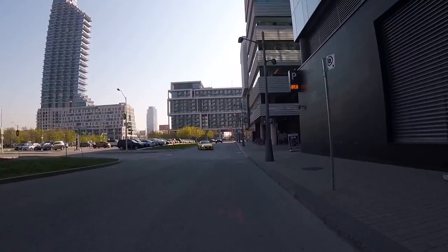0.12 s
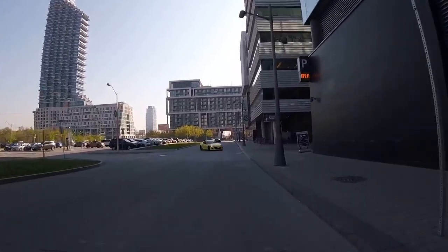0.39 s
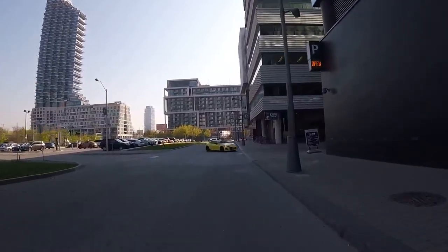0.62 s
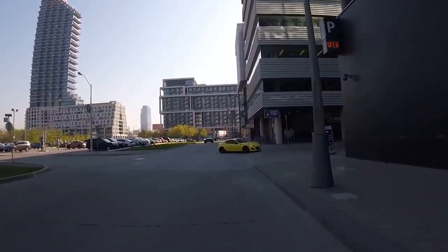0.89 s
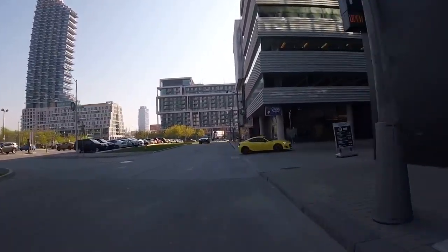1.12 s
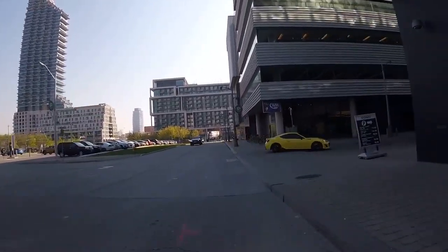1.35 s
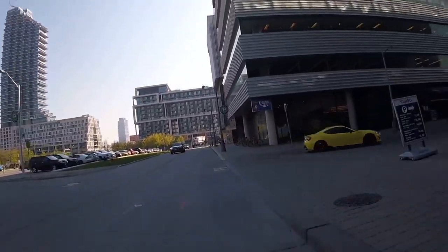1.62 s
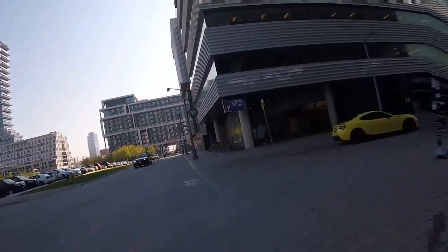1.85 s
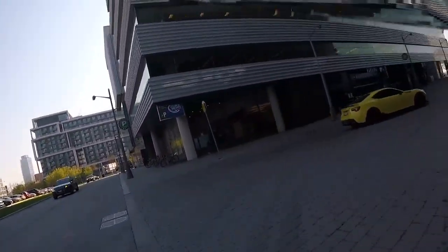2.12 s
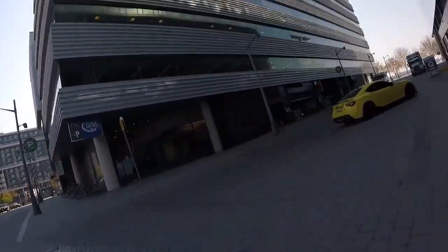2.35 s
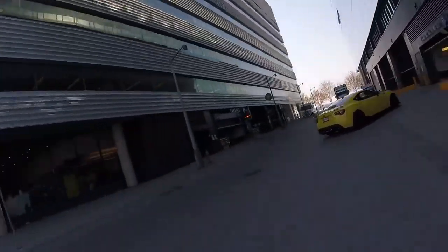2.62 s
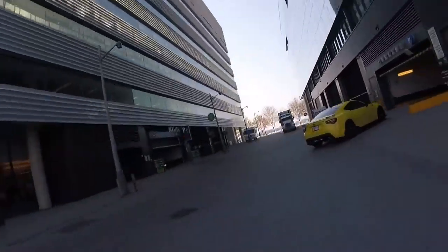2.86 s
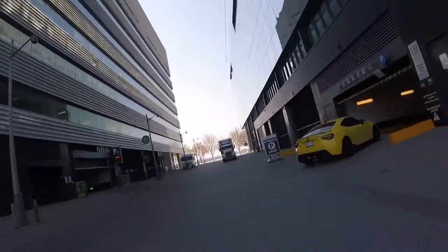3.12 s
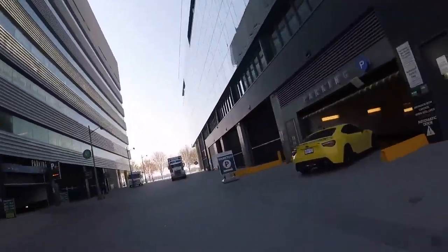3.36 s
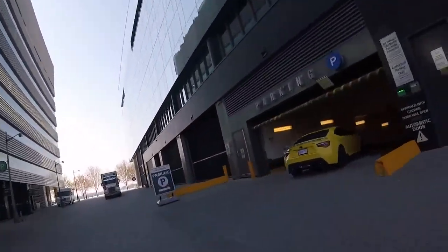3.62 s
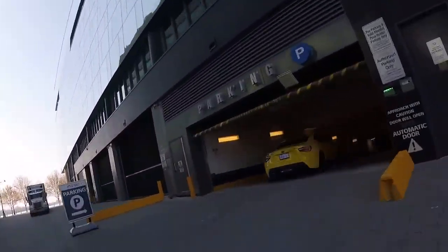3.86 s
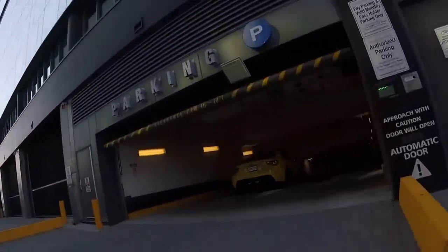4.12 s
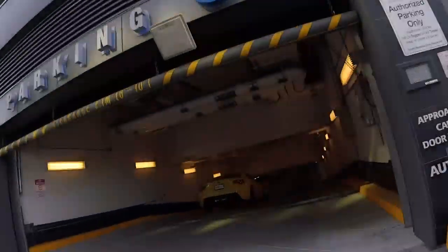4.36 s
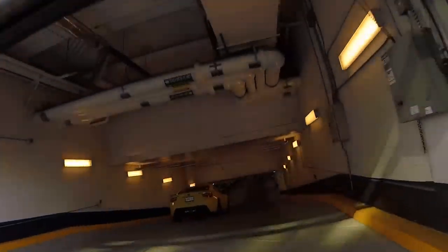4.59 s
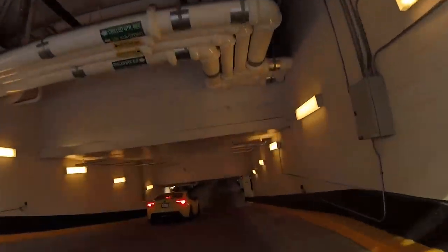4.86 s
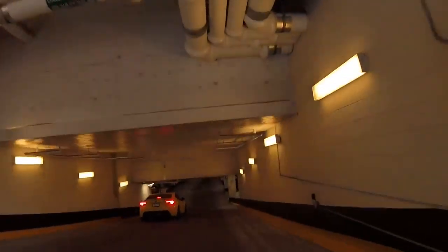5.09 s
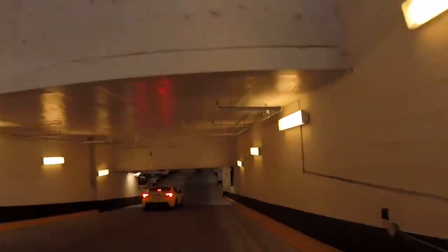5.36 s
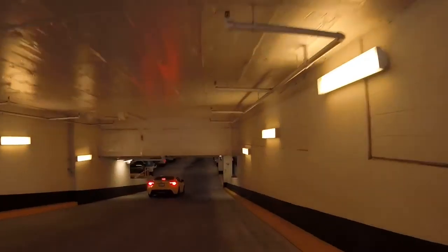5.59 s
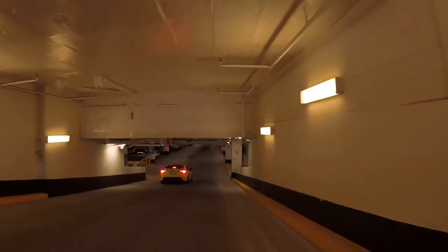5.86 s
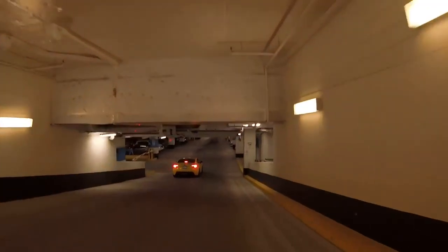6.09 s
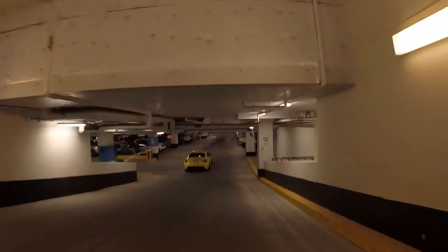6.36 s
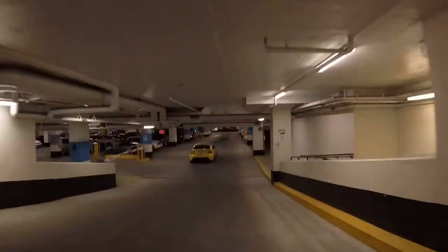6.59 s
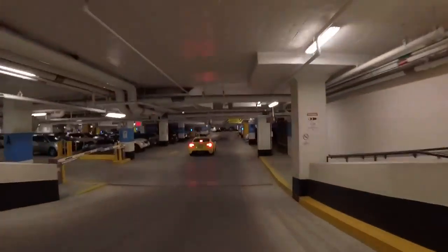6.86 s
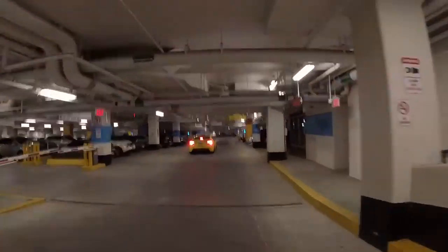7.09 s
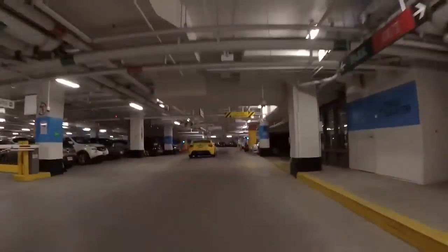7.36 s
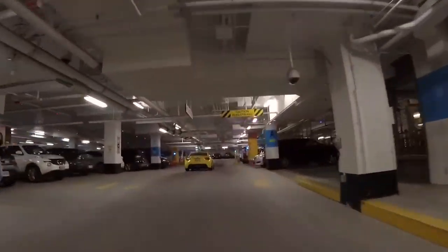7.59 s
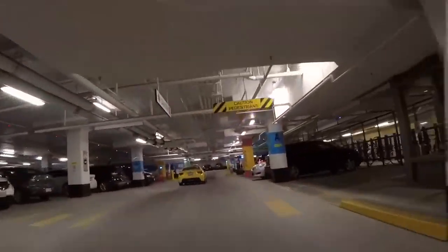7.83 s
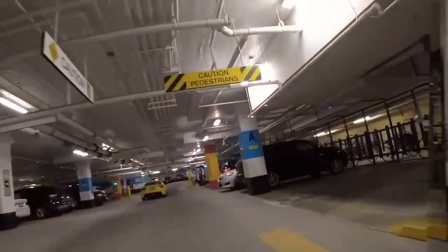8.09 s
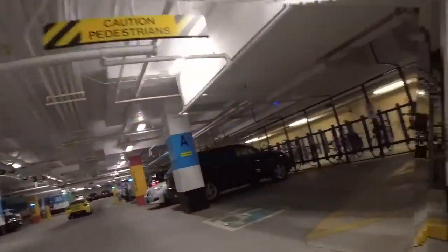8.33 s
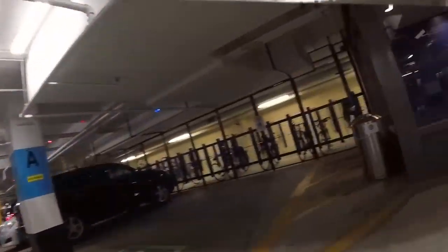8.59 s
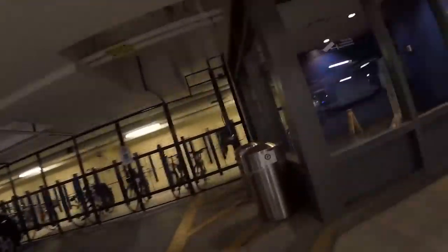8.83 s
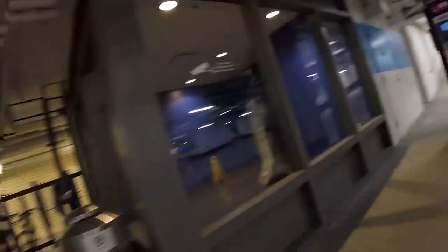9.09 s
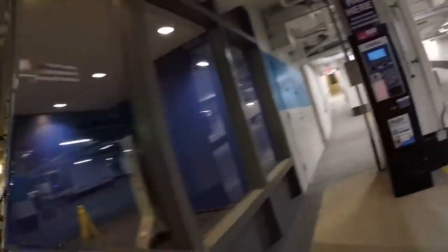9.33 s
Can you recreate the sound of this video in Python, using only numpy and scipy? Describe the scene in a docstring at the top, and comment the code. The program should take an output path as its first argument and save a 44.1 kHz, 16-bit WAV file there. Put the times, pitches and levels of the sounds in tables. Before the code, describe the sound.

A bicycle rolls over pavement and down a garage ramp with a low shaky hum, jolting knocks and constant crisp ticks, then brakes and groans to a stop.

```python
"""On paving and down a garage ramp, a bicycle rolls with a camera clamped to its frame. Noise-shaken modes near 300 Hz
make the mount hum, filtered grit makes thud, drone and rattle, and joints ring the frame with short jolts.
Air hisses and puffs, metal squeaks and pings, the tread tone sinks, and a brake rubs before the stop groans.
The sound was sped up by splicing: at each splice a single sample drops toward or past zero with a tick."""
import sys
import numpy as np
from scipy import signal
from scipy.fft import rfft, irfft, next_fast_len
from scipy.io import wavfile
from scipy.ndimage import uniform_filter1d, map_coordinates

SR = 44100
rng = np.random.default_rng(int(sys.argv[2]) if len(sys.argv) > 2 else 0)


def to_wav(s):
    """Save 16-bit WAV."""
    ch = np.atleast_2d(s).T  # columns
    pcm = np.round(np.clip(ch, -1, 1) * 32767)  # PCM
    wavfile.write(sys.argv[1], SR, pcm.astype(np.int16))


def gain_from_db(level_db):
    """Turn a decibel level (scalar or array-like) into a linear amplitude factor."""
    decades = np.asarray(level_db, float) / 20
    return 10 ** decades


N = 417186

# Faint tyre hiss: (time [s], level [dB])
TYRE_HISS_LEVEL = [(0, -63), (1, -62.5), (2.5, -63), (3.1, -62), (3.5, -62.5), (4.3, -59), (4.6, -60),
                   (5.1, -55), (6, -59), (7, -62.5), (7.8, -63.5), (8.5, -58.5), (8.9, -55), (9, -59),
                   (9.25, -53), (9.35, -57), (9.46, -57)]
# Spectrum of the hiss and of the jingling parts: (frequency [Hz], relative level [dB])
HISS_COLOUR = [(1000, -40), (1600, 4.5), (2200, 5.5), (3000, 0.5), (3900, -3.5), (4500, -5.5), (5050, 3),
               (5600, -6.5), (7000, -6.5), (9000, -15.5), (10000, -23), (15500, -33), (22000, -120)]
# Chirps of rubbing metal: (time [s], peak level [dB], frequency [Hz], length [s])
SQUEAKS = [(.6, -53, 5200, 0.017), (3.198, -41, 3050, 0.0087), (3.012, -46, 4900, .006),
           (3.108, -44, 4900, .006), (4.454, -47, 5400, 0.017), (4.472, -44, 5200, .016),
           (4.62, -52, 5500, 0.026), (4.638, -51, 4550, 0.025), (4.65, -48, 5300, 0.013),
           (7.42, -44, 5100, .015)]
# Bursts of escaping air: (time [s], level of the head [dB])
AIR_PUFFS = [(6.454, -31), (6.636, -34), (6.68, -43.5)]
# Spectrum of the escaping air: (frequency [Hz], relative level [dB])
PUFF_COLOUR = [(880, -24), (1500, -9), (2010, -7.5), (2870, -2.5), (4080, -6), (5070, 3), (6140, -9),
               (8010, -10.5), (11000, -37), (14300, -50), (22000, -120)]
# Groans at the stop, one row a mode: (time [s], level [dB], rise [s], fall by 60 dB [s])
CREAK_SWELLS = [(9.281, -20, 0.0091, 0.18), (9.31, -17, 0.013, 0.12)]
# The modes that groan, in the same order: (frequency [Hz], width [Hz])
CREAK_MODES = [(1254, 260), (798, 140)]
# Knocks at the paving joints: (time [s], relative strength [dB], extra strength in the upper modes [dB])
PAVING_JOINTS = [(0.512, -21.5, -4), (0.892, -23.5, -0.5), (2.752, -25, 1), (2.792, -22.5, -3),
                 (2.889, -15.5, -8.5), (3.017, -15, -0.5), (3.035, -17.5, -9), (3.059, -24, 4),
                 (3.092, -22.5, 3.5), (3.113, -19.5, -5.5), (3.175, -16, -5), (3.189, -17, -4),
                 (3.213, -21.5, -11), (3.294, -26, -3), (3.327, -28, 1), (4.187, -27, -3),
                 (4.234, -19.5, 0), (4.254, -16.5, -1), (4.271, -25, -5), (4.322, -16.5, -3.5),
                 (4.338, -30, 2), (4.354, -26, -2), (4.383, -26, -5), (4.414, -24, 0), (4.467, -30, -5),
                 (4.713, -18.5, -3), (5.156, -21.5, -4), (5.279, -23, -2), (5.718, -16.5, -3.5),
                 (5.762, -24, -12), (5.862, -17, -4.5), (6.143, -18, -12), (6.226, -18, 1.5),
                 (6.347, -19.5, -5.5), (6.394, -24, 0), (6.434, -23, -3), (6.507, -16, -1), (6.693, -22, 2),
                 (6.719, -21.5, 0), (6.844, -19, -3), (7.146, -21, -3.5), (7.324, -23, -1),
                 (7.356, -24, -1), (7.376, -18.5, -7), (7.449, -21, -7), (7.459, -17.5, -3),
                 (7.521, -21.5, -15), (7.656, -20, -11), (7.859, -24, -8), (8.768, -19, -8),
                 (8.999, -25.5, 10), (9.236, -23, 7.5), (9.287, -29.5, 18), (9.325, -19, 8)]
# Ringing modes of the frame: (frequency [Hz], width [Hz], relative level [dB])
FRAME_MODES = [(128, 49, 4.5), (273.5, 67, 9), (469, 227, 2), (623, 352, -1), (845, 164, -3.5),
               (1028, 320, -4), (1308, 320, -3.5), (1890, 200, -8), (2380, 360, -8.5)]
# Rolling strength: (time [s], lower hum level [dB], upper hum level [dB], relative rattle level [dB])
ROAD_LEVELS = [(0.0, -27.5, -18.5, -33.5), (0.39, -40.5, -16.5, -36), (1.63, -22.5, -17.5, -35),
               (2.63, -26.5, -17.5, -35.5), (3.11, -22, -27.5, -38), (3.45, -33.5, -25, -45.5),
               (3.71, -21, -24, -35.5), (4.14, -20.5, -20.5, -36), (4.58, -32.5, -34, -44),
               (4.82, -28, -24.5, -38), (5.8, -21.5, -21, -36), (7.61, -25, -19, -34),
               (7.98, -32.5, -30.5, -37), (8.35, -21.5, -21.5, -32.5), (8.67, -32, -25, -36.5),
               (9.14, -25.5, -27, -35), (9.43, -36, -22, -43), (9.46, -21, -36, -42.5)]
# Bass from rolling: (time [s], thud level [dB], drone level [dB])
BASS_LEVELS = [(0.0, -26.5, -24.5), (1.08, -24.5, -24), (1.55, -29, -26.5), (3.16, -22.5, -28.5),
               (3.5, -26.5, -41.5), (3.74, -21.5, -27.5), (7.67, -23, -25.5), (8.01, -26.5, -30.5),
               (8.56, -26.5, -26.5), (9.38, -24.5, -28.5), (9.46, -32, -36)]
# The mount's two humming modes: (frequency [Hz], width [Hz])
MOUNT_MODES = [(256, 44.8), (304, 48.2)]
# Spectrum of the lowest thud: (frequency [Hz], relative level [dB])
THUD_COLOUR = [(8.8, -21), (15, -9.5), (38, 3), (80, -8), (100, -39), (180, -120)]
# Spectrum of the low drone: (frequency [Hz], relative level [dB])
DRONE_COLOUR = [(47, -7.5), (80, -1), (129, 0.5), (172, -3.5), (230, -6), (300, -60), (510, -120)]
# Spectrum of the loose parts' rattle: (frequency [Hz], relative level [dB])
RATTLE_COLOUR = [(200, -24), (340, -8.5), (368, -10), (440, -16.5), (499, -16.5), (676, -28.5),
                 (748, -25.5), (1060, -32), (1180, -31), (1480, -41), (2200, -61.5), (2860, -77),
                 (4840, -120)]
# Interleaved splice patterns: (first run [s], gap between runs [s], catch-up every sixth run [s],
# gap within a run [s], splices per run [count], catch-up phase [runs])
SPLICE_RUNS = [(.210706, .567549, .066772, .06678, 7, 4), (.357052, .567392, .066757, .066769, 5, 4),
               (.362378, .567709, .066773, .066795, 7, 4), (.47737, .567279, .066735, .066757, 2, 5)]
# Loudest ticks, each put on the nearest splice: (time [s], jump before the band limit [dB])
LOUD_TICKS = [(0.062, -10.5), (0.129, -9.0), (0.357, -12.5), (0.411, -13.5), (0.491, -14.0), (0.611, -13.5),
              (0.63, -13.0), (0.845, -14.0), (0.924, -11.5), (0.978, -11.0), (1.425, -13.5), (1.479, -14.5),
              (1.492, -14.0), (1.559, -15.0), (1.612, -10.5), (1.625, -14.0), (1.847, -12.5),
              (2.047, -13.5), (2.4, -11.0), (2.548, -14.5), (2.56, -11.5), (2.627, -12.0), (2.68, -14.0),
              (2.693, -10.5), (2.834, -13.5), (3.115, -9.0), (3.194, -10.0), (3.75, -11.5), (3.895, -13.0),
              (3.95, -15.5), (4.103, -12.0), (4.117, -14.0), (4.329, -10.0), (4.837, -13.0), (4.951, -12.0),
              (4.971, -14.5), (5.185, -12.5), (5.405, -12.0), (5.539, -13.0), (5.586, -15.0),
              (6.017, -11.5), (6.04, -15.0), (6.098, -13.5), (6.654, -14.5), (6.721, -10.0), (6.874, -13.5),
              (6.955, -11.5), (7.151, -14.5), (7.166, -9.0), (7.175, -12.0), (7.218, -9.0), (7.222, -14.5),
              (7.242, -13.5), (7.288, -12.0), (7.375, -15.0), (7.609, -12.0), (7.722, -12.0),
              (8.156, -13.5), (8.223, -14.0), (8.301, -15.0), (8.31, -13.5), (8.367, -15.0), (8.511, -15.0),
              (8.657, -14.0), (8.811, -12.0), (9.225, -14.5)]

BRAKE_S, TREAD_HZ, SLOWING_PER_S = 8.2, 259, 0.84
TREAD_DB, TREAD_RISE_S, TREAD_T60_S = -15.5, 0.41, 4.3
SCUFF_S, SCUFF_DB, SCUFF_RISE_S, SCUFF_T60_S = 8.85, -49, 0.05, 1.1
PING_S, PING_DB, PING_HZ, PING_T60_S = 3.195, -65, 4850, 1.1
PUFF_RISE_S, PUFF_T60_S, PUFF_LASTS_S = 0.006, 0.15, 0.21
PUFF_TAIL_DB, PUFF_TAIL_T60_S = -10, 1  # tail level relative to the head
SCRAPE_S, SCRAPE_END_S, SCRAPE_DB, SCRAPE_GROWS_DB_PER_S = 8.866, 9.28, -53.5, 41
REBOUND_MEAN_WAIT_S = 0.03  # on top of a fixed 12 ms
REBOUND_DB, REBOUND_SPREAD_DB = -29.5, 3.5  # on the strength scale of the joints
HUM_SWELL_DB = 0.5
SOFT_TICK_DB = -16.5  # ceiling of the ticks that are not listed


def unit(x):
    """Scales a signal to rms 1."""
    return x / np.sqrt(np.mean(np.abs(x) ** 2) + 1e-20)


def curves(rows):
    """Draws each column after the time as a line with one value per sample."""
    s, *columns = np.transpose(rows)
    return [np.interp(np.arange(N) / SR, s, column) for column in columns]


def wobble(rate):
    """A smooth random curve with rate knots a second."""
    knots = rng.standard_normal(int(N * rate / SR) + 4)
    return map_coordinates(knots, [np.arange(N) * rate / SR])


def swell(start_s, rise_s, t60_s):
    """Gain that rises from its start while an exponential decay pulls it down."""
    t = np.clip(np.arange(N) / SR - start_s, 0, None)
    return (1 - np.exp(-(t / rise_s) ** 2)) * gain_from_db(-60 * t / t60_s)


def coloured(x, spectrum):
    """Filters x through a spectrum drawn on a log frequency axis and brings it to rms 1."""
    size = next_fast_len(N + 8192)
    hz, db = np.transpose(spectrum)
    log_f = np.log(np.fft.rfftfreq(size, 1 / SR) + 1)
    gain = gain_from_db(np.interp(log_f, np.log(hz + 1), db))
    return unit(irfft(rfft(x, size) * gain, size)[:N])


def grit(lumpy_db, rate):
    """White noise whose strength comes in random lumps."""
    return rng.standard_normal(N) * gain_from_db(lumpy_db * wobble(rate))


def resonance(hz, width_hz, steady):
    """A mode of fixed or moving pitch shaken by noise; a steady share evens out its beating."""
    f = np.fft.fftfreq(N, 1 / SR)
    shake = rng.standard_normal(N) + 1j * rng.standard_normal(N)
    swing = unit(np.fft.ifft(np.fft.fft(shake) / (1 + (2 * f / width_hz) ** 2)))
    swing *= (np.abs(swing) + 0.045) ** -steady
    carrier = np.exp(2j * np.pi * np.cumsum(hz + np.zeros(N)) / SR)
    return unit((swing * carrier).real)


def tyre_hiss():
    """A faint grainy hiss of filtered noise under the whole ride."""
    return gain_from_db(curves(TYRE_HISS_LEVEL)[0]) * coloured(grit(lumpy_db=2.5, rate=190), HISS_COLOUR)


def scuff():
    """One soft airy swish before the stop: a very wide mode shaken by noise."""
    swish = resonance(4500, width_hz=4900, steady=0)
    return gain_from_db(SCUFF_DB) * swell(SCUFF_S, SCUFF_RISE_S, SCUFF_T60_S) * swish


def ping():
    """A thin metal part rings on after a hard joint as one narrow fading mode."""
    ring = resonance(PING_HZ, width_hz=14, steady=0.8)
    return gain_from_db(PING_DB) * swell(PING_S, 0.004, PING_T60_S) * ring


def squeaks():
    """Rubbing metal gives tiny sine chirps, roughened by a randomly wandering phase."""
    out = np.zeros(N)
    wanders = rng.standard_normal((len(SQUEAKS), SR // 5))
    for (s, db, hz, length), wander in zip(SQUEAKS, wanders):
        t = np.arange(round(length * SR)) / SR
        phase = 2 * np.pi * hz * t + 0.16 * np.cumsum(wander)[:len(t)]
        chirp = np.sin(np.pi * t / length) * np.sin(phase)
        out[round(s * SR):][:len(t)] += gain_from_db(db) * chirp
    return out


def puffs():
    """Escaping air is rough noise with a sharp head and a weaker tail, until the valve closes."""
    t = np.arange(N) / SR
    gain = np.zeros(N)
    for s, db in AIR_PUFFS:
        head = swell(s, PUFF_RISE_S, PUFF_T60_S)
        tail = gain_from_db(PUFF_TAIL_DB) * swell(s, PUFF_RISE_S, PUFF_TAIL_T60_S)
        closing = np.clip((s + PUFF_LASTS_S - t) / 0.05, 0, 1)
        gain += gain_from_db(db) * (head + tail) * closing
    return gain * coloured(grit(lumpy_db=2.2, rate=150), PUFF_COLOUR)


def tread_tone():
    """The tread blocks' wavering tone sinks exponentially in pitch from the start of braking."""
    braking_s = np.clip(np.arange(N) / SR - BRAKE_S, 0, None)
    hz = TREAD_HZ * np.exp(-SLOWING_PER_S * braking_s)
    tone = resonance(hz, width_hz=22, steady=0.6)
    return gain_from_db(TREAD_DB) * swell(BRAKE_S, TREAD_RISE_S, TREAD_T60_S) * tone


def scrape():
    """Brake pads bite harder toward the stop: a grainy rub around 1.2 kHz with a growing level."""
    t = np.arange(N) / SR
    on = np.clip((t - SCRAPE_S) / 0.092, 0, 1) * np.clip((SCRAPE_END_S - t) / 0.035, 0, 1)
    grain_db = 2.5 * wobble(60)
    db = SCRAPE_DB + SCRAPE_GROWS_DB_PER_S * np.clip(t - SCRAPE_S, 0, 1) + grain_db
    return on * gain_from_db(db) * resonance(1200, width_hz=620, steady=0)


def creak():
    """Two frame modes groan in turn as the bicycle stops, with a rough edge above the first."""
    gains = [gain_from_db(db) * swell(s, rise, t60) for s, db, rise, t60 in CREAK_SWELLS]
    out = gain_from_db(-23) * gains[0] * resonance(1900, width_hz=610, steady=0)
    for gain, (hz, width) in zip(gains, CREAK_MODES):
        out += gain * resonance(hz, width, steady=0.1)
    return out


def rebounds():
    """Lists one weak knock of random size and hardness a random while after each joint."""
    wait, size, hard = rng.random((len(PAVING_JOINTS), 3)).T
    s = np.transpose(PAVING_JOINTS)[0] + 0.012 - REBOUND_MEAN_WAIT_S * np.log(1 - wait)
    db = REBOUND_DB + REBOUND_SPREAD_DB * (2 * size - 1)
    return list(zip(np.minimum(s, N / SR), db, 6 * (hard - 0.5)))


def joints():
    """Each paving joint is a brief rough jolt that rings the lower and upper frame modes separately."""
    jolts = np.zeros((2, N + 8192))  # drive of the lower modes, drive of the upper modes
    t = np.arange(SR // 25) / SR
    envelope = gain_from_db(-60 * t / 0.036) * (1 - np.exp(-t / 0.00065))
    knocks = list(PAVING_JOINTS) + rebounds()
    for (s, db, upper_db), rough in zip(knocks, rng.standard_normal((len(knocks), len(t)))):
        jolt = unit(uniform_filter1d(rough, size=14) * envelope)
        start = round((s - 0.002) * SR)  # contact builds just before the ring
        jolts[:, start:][:, :len(t)] += gain_from_db([[db - 3.0], [db + upper_db - 8.5]]) * jolt

    f = np.fft.rfftfreq(N + 8192, 1 / SR)
    drives = rfft(jolts)
    rung = np.zeros(len(f), complex)
    for k, (hz, width, db) in enumerate(FRAME_MODES):
        mode = 1j * f * width / (hz * hz - f * f + 1j * f * width)
        sign = (-1) ** k  # neighbouring modes ring in opposite sign
        rung += sign * gain_from_db(db) * mode * drives[int(hz > 950)]
    cushion = gain_from_db(-21.5) + 1 / (1 + (f / 1650) ** 10)  # the tyres swallow the sharp part of the blow

    # loose small parts chatter along with the jolts
    jingle = gain_from_db(-39.5) * np.abs(jolts[1, :N]) * coloured(rng.standard_normal(N), HISS_COLOUR)
    return irfft(rung * cushion, N + 8192)[:N] + jingle


def road():
    """Rolling grit shakes the mount's two modes, the whole frame and its loose parts."""
    *hum_db, rattle_db = curves(ROAD_LEVELS)
    thud_db, drone_db = curves(BASS_LEVELS)
    hum = np.zeros(N)
    for db, (hz, width) in zip(hum_db, MOUNT_MODES):
        hum += gain_from_db(db + HUM_SWELL_DB * wobble(6)) * resonance(hz, width, steady=0.29)
    thud = gain_from_db(thud_db) * coloured(grit(lumpy_db=-2.1, rate=5.6), THUD_COLOUR)
    drone = gain_from_db(drone_db) * coloured(grit(lumpy_db=1.57, rate=9), DRONE_COLOUR)
    rattle = gain_from_db(rattle_db + 4.5) * coloured(grit(lumpy_db=2.0, rate=76), RATTLE_COLOUR)
    return hum + thud + drone + rattle


def scene():
    """Sums all sources into one channel."""
    background = tyre_hiss() + scuff() + ping() + squeaks() + puffs()
    stopping = tread_tone() + scrape() + creak()
    return (background + stopping + joints() + road())[None]


def splices():
    """Sample numbers of all splices: interleaved patterns of short, evenly spaced runs."""
    run = np.arange(-1, 17)[:, None]
    times = []
    for first, gap, catch_up, step, count, phase in SPLICE_RUNS:
        run_start = first + run * gap - (run + phase) // 6 * catch_up
        times.append((run_start + step * np.arange(count)).ravel())
    s = np.concatenate(times)
    return np.round(s[(s > 0) & (s < N / SR)] * SR).astype(int)


def tick(x):
    """A one-sample jump at each splice is heard as a tick; it follows the sign of the sound there."""
    at, (s, db) = splices(), np.transpose(LOUD_TICKS)
    ceiling = gain_from_db(SOFT_TICK_DB)
    jump = ceiling * np.tanh(x[0, at] / ceiling)
    loud = np.abs(at - SR * s[:, None]).argmin(axis=1)  # nearest splice to each listed tick
    jump[loud] = np.sign(jump[loud]) * gain_from_db(db)
    ticked = x.copy()
    ticked[0, at] -= jump
    return ticked


def top_cut(x):
    """Nothing passes above the cut-off."""
    return signal.sosfilt(signal.butter(12, 16990, fs=SR, output="sos"), x)


def record(dry):
    """Rounds peaks off softly, adds the splice ticks and trims the top with a steep band limit."""
    rounded = dry / (1 + np.abs(dry / 0.46) ** 5) ** (1 / 5)
    band_limit = signal.cheby2(12, 30, 16600, fs=SR, output="sos")
    mix = signal.sosfiltfilt(band_limit, tick(rounded))
    return top_cut(mix)


dry = scene()
out = record(dry)
to_wav(out)
```